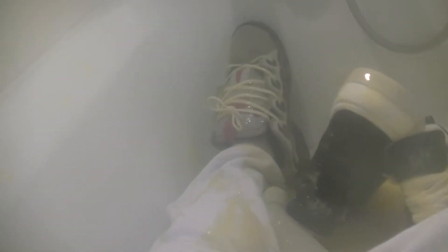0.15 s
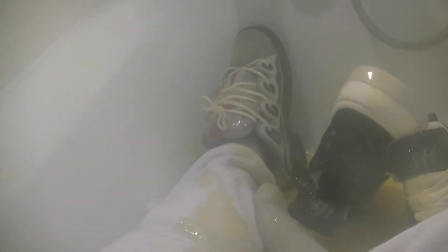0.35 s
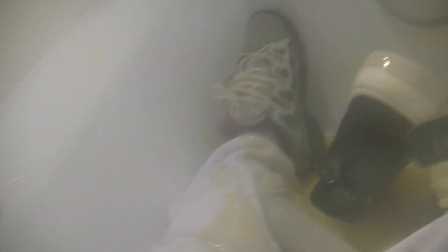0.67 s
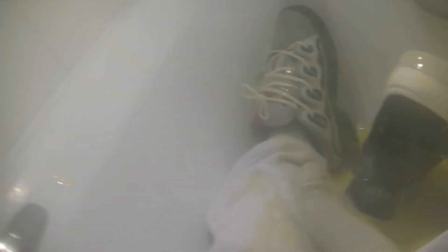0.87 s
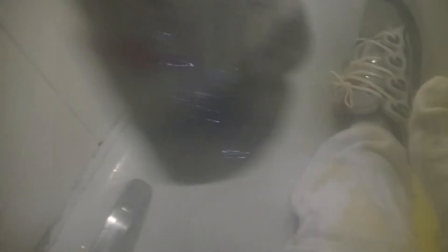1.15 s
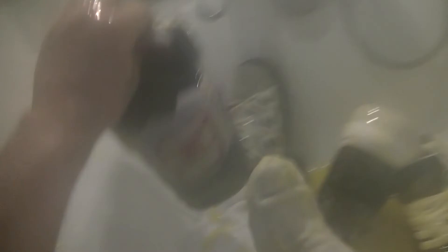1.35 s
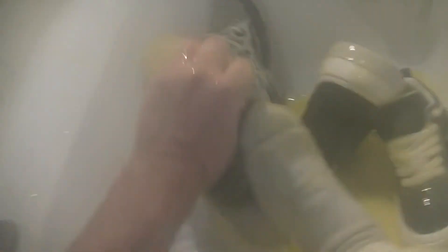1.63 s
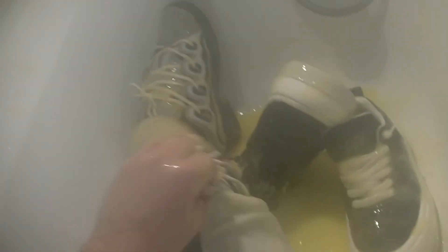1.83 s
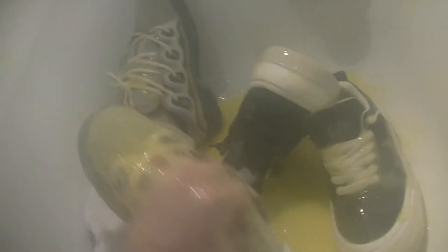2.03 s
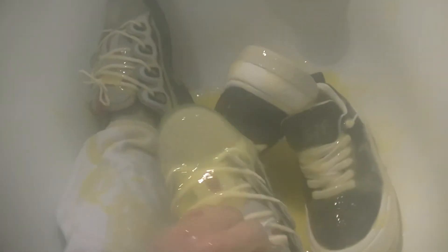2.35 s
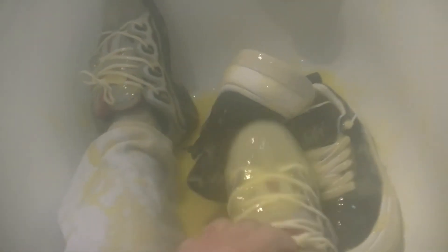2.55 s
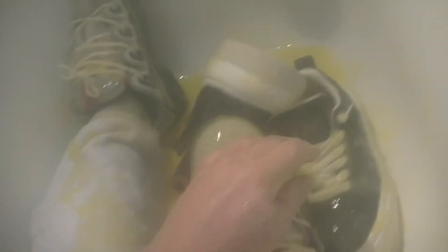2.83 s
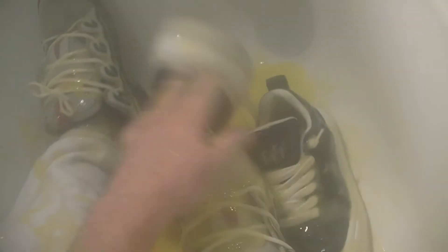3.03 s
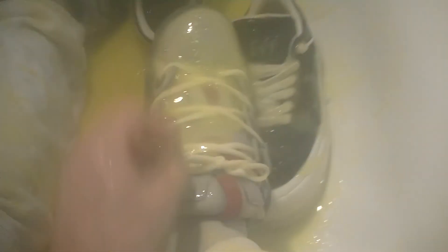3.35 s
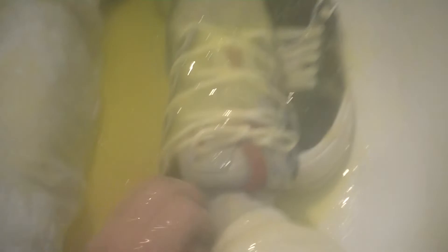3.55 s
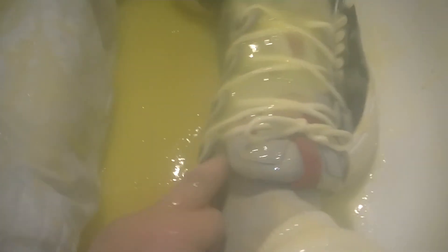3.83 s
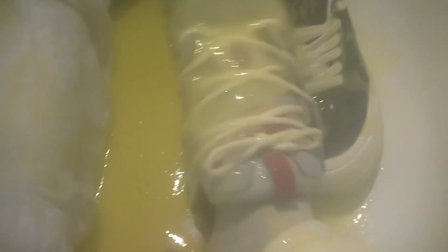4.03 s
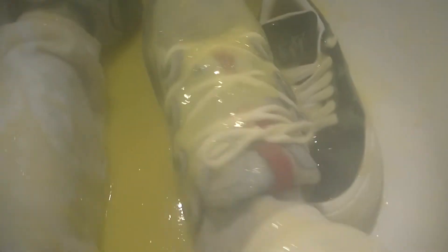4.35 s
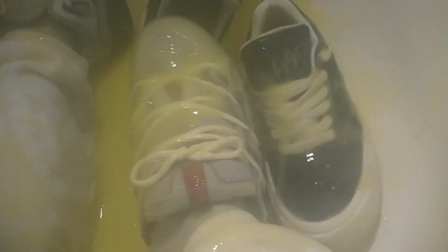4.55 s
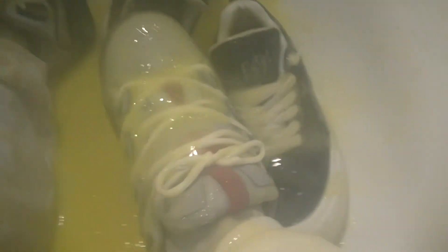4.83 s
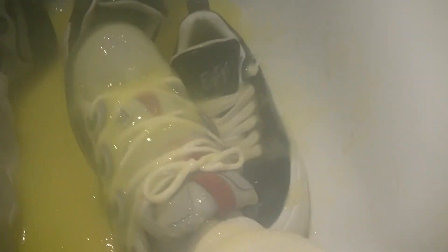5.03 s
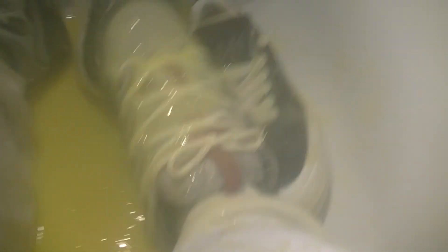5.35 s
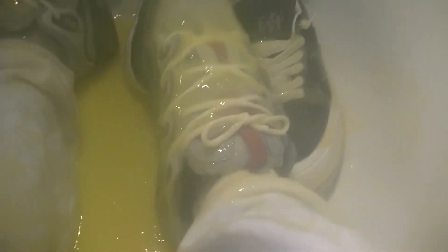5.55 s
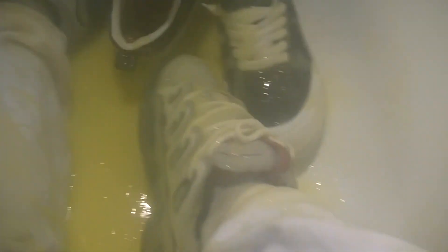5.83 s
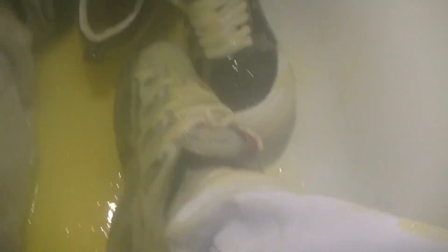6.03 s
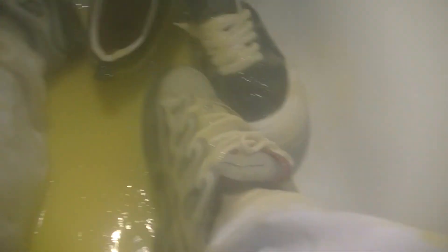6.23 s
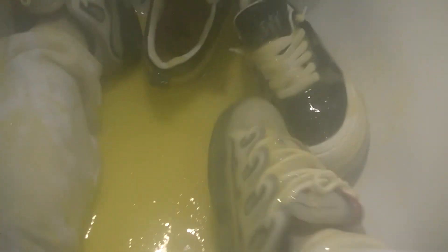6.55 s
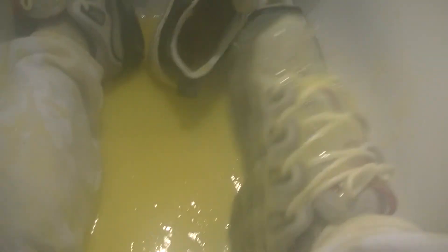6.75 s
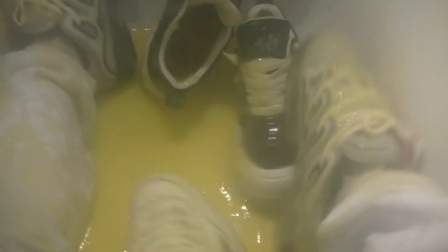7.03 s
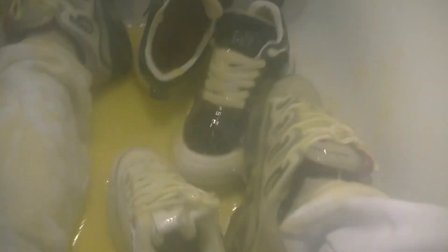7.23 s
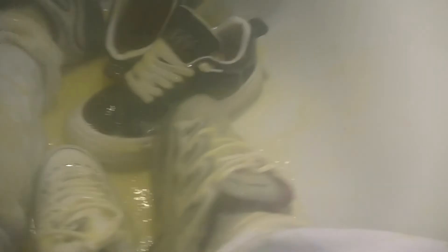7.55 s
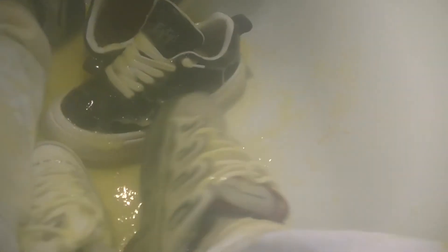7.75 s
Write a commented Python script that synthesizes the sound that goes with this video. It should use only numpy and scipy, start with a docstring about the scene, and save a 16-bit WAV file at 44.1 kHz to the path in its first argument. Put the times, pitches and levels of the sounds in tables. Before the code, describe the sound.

Frothy sliding cloth and wet shoes peel stickily in a tiled bathroom, amid hollow knocks, hard clicks and popping bubbles.

```python
"""A hushed tiled room comes first, then a faint wet smear and frothy squirts: sneakers pushed in a tub of slime.
Sliding cloth is dense crackle and foam; soles smack free as swelling pops that ring an air pocket.
Squirts are gliding tones or bands of noise, bubbles short rising rings, and shoe knocks ring the tub's modes.
A hand on a camera's case rubs, snaps, creaks and bumps close to the two microphone ports."""
import sys
import numpy as np
from scipy import signal
from scipy.io import wavfile
from scipy.ndimage import uniform_filter1d, minimum_filter1d

SR = 44100
rng = np.random.default_rng(int(sys.argv[2]) if len(sys.argv) > 2 else 0)


def unload_wav(signal):
    """Save mono or channel-first audio to the path in sys.argv[1] as 16-bit WAV at rate SR, clipped to [-1, 1]."""
    wavfile.write(
        sys.argv[1],
        SR,
        np.round(np.clip(np.atleast_2d(signal).T, -1, 1) * 32767).astype(np.int16),
    )


N = 347508
TIME = np.arange(N) / SR  # seconds

# All levels below are relative, ahead of each source's trims and the mix.
# suction lets go, in a snap or a slow peel: peak_s, level_db, pocket_hz, build_up_s, decay_s
SMACK_EVENTS = [(0.663, -39.5, 3420, 0.014, 0.0062), (0.728, -42, 5550, 0.0081, 0.13),
                (1.498, -34.5, 1480, 0.00098, 0.0022), (1.611, -34.5, 5600, 0.0013, 0.028),
                (2.101, -29.5, 5700, 0.0015, 0.0017), (2.223, -31.5, 5370, 0.0021, 0.012),
                (2.254, -33.5, 4930, 0.0048, 0.0087), (2.583, -34, 5360, 0.0073, 0.01),
                (2.943, -32.5, 5060, .001, 0.0049), (3.029, -39.5, 2000, 0.015, 0.028),
                (3.174, -29, 5100, 0.0019, 0.012), (3.194, -28, 4560, 0.0012, 0.0089),
                (3.214, -28, 1120, 0.0024, 0.012), (3.378, -34, 5100, 0.0051, 0.0066),
                (3.419, -31, 2886, 0.0095, 0.0036), (3.459, -33.5, 1980, 0.0098, 0.023),
                (3.855, -28.5, 4400, 0.039, 0.011), (3.887, -23.5, 5640, 0.015, 0.011),
                (4.149, -33, 2960, 0.032, 0.036), (4.446, -15.5, 5900, 0.0016, 0.003),
                (4.468, -19, 3660, 0.011, 0.004), (5.192, -32, 6170, 0.012, 0.033),
                (5.241, -22.5, 5300, 0.00074, 0.01), (5.271, -22, 3750, 0.0061, 0.013),
                (5.2911, -13, 3080, 0.005, 0.0017), (5.299, -16, 5500, 0.023, 0.0071),
                (5.665, -24, 2820, 0.0013, 0.0086), (5.684, -31, 5050, 0.022, .014),
                (6.604, -28, 3870, 0.021, 0.01), (6.748, -37.5, 10800, .004, 0.01),
                (6.928, -31.5, 5000, 0.0011, 0.008), (6.982, -35, 10800, 0.018, 0.01),
                (7.031, -27.5, 3970, 0.0052, 0.015), (7.074, -24, 6000, 0.0097, 0.0039),
                (7.097, -11.5, 3420, 0.0028, 0.0026), (7.1656, -4, 3700, 0.00043, 0.00048),
                (7.172, -7, 6050, 0.0007, 0.0054), (7.181, -21.5, 3700, 0.002, 0.024),
                (7.265, -13.5, 5700, 0.001, 0.0024), (7.2754, -11, 3580, 0.003, 0.0012),
                (7.484, -26.5, 5470, 0.00047, 0.016)]
# air squeezed through the slime: start_s, level_db, pitch_hz, length_s, glide (pitch factor), width_hz
SQUIRT_EVENTS = [(0.422, -36, 4900, 0.03, 0.89, 2000), (0.434, -37.5, 4940, 0.15, 1.02, 1820),
                 (0.435, -37.5, 3780, 0.25, 1.08, 450), (3.8375, -18, 2270, 0.0091, 0.85, 55.56),
                 (3.849, -33, 2120, 0.052, 1, 648.1), (4.441, -12.5, 3890, 0.012, 0.92, 150),
                 (4.444, -19, 1526, 0.01, 1.9, 100), (6.557, -41, 2160, 0.08, 1.24, 486),
                 (6.872, -30, 3890, 0.0092, 0.76, 216), (6.93, -24.5, 5060, 0.018, 1.22, 302.4),
                 (7.0215, -17, 3360, 0.029, 0.6, 70), (7.036, -34, 2174, 0.039, 1.4, 248)]
# air bubbles out of a shoe, one pop at a time: start_s, level_db, pitch_hz
BUBBLE_EVENTS = [(5.4584, -31.5, 3650), (5.4823, -29, 3860), (5.494, -28, 3650), (5.5019, -25.5, 3820),
                 (5.5321, -23, 3650), (5.5443, -24, 3900), (5.549, -21.5, 3250), (5.5542, -29, 3660),
                 (5.557, -19.5, 3750), (5.569, -40, 3620), (5.6594, -25, 3440), (5.682, -29, 3800),
                 (5.6938, -27, 3850), (7.169, -17, 3980), (7.27, -25, 3400), (7.2746, -15, 3580),
                 (7.846, -36, 3550)]
# wet cloth and soles sliding in the slime: time_s, level_db
SLIDING_LEVEL = [(0.0, -67.5), (0.46, -56.5), (0.61, -54.5), (0.94, -55.5), (1.25, -48), (1.38, -56.5),
                 (1.69, -58), (2.13, -47.5), (2.24, -52.5), (2.79, -55.5), (3.49, -53), (3.58, -47),
                 (4.19, -51), (4.34, -46.5), (4.54, -49), (4.67, -92), (4.91, -53.5), (5.22, -51.5),
                 (5.35, -42), (5.42, -53), (5.55, -47.5), (5.75, -53), (5.88, -49), (6.3, -57.5),
                 (6.98, -54), (7.11, -35), (7.18, -43), (7.31, -48), (7.55, -58), (7.88, -45.5)]
# where the work goes on: time_s, left_minus_right_db
WORK_PLACE = [(0.4, 1), (2.2, 1), (3.4, 5), (3.85, 3.5), (4.45, -7.5), (5.3, -2.5), (7.1, -2.5), (7.5, -1)]
# a shoe meets the tub: start_s, level_db, centre_hz, spread_octaves
THUD_EVENTS = [(0.58, -45, 199, 0.52), (0.627, -46.5, 242, 0.55), (0.791, -38.5, 88, 0.74),
               (1.213, -11.5, 68, 1.1), (1.227, -12.5, 100, 0.61), (1.234, -25.5, 256, 0.278),
               (1.283, -25, 133, 0.59), (2.174, -41.5, 322, 0.31), (2.247, -38, 350, 0.66),
               (2.944, -31.5, 339, 0.47), (3.2121, -14, 258, 0.56), (3.2463, -22.5, 225, 0.464),
               (3.3306, -24.5, 232, 0.51), (3.354, -39.5, 260, 0.68), (3.781, -40.5, 297, 0.36),
               (3.839, -40, 366, 0.81), (4.472, -24, 325, 0.45), (4.48, -30.5, 146, 0.2),
               (5.246, -37, 393, 1.2), (5.287, -32, 356, 0.54), (5.659, -41, 304, 0.75),
               (5.982, -43.5, 138, 1.16), (6.926, -36, 310, 0.67), (7.076, -40, 285, 0.26),
               (7.093, -32.5, 190, 0.6), (7.642, -43, 141, 0.68)]
# the tub's modes: mode_hz, level_db, t60_s
TUB_MODES = [(38.3, 5, 1.88), (45.2, 7, 0.76), (78.4, 1.5, 0.43), (112, 7.5, 0.5), (134.2, -15.5, 1),
             (168.5, 5.5, 0.18), (228, 1.5, 0.092), (260, -0.5, 0.24), (277, 2.5, 0.17), (310.4, -17, 0.49),
             (360, -8.5, 0.3), (400, -1, 0.18), (467.4, -8, 0.207), (551, -1.5, 0.12), (855, 13.5, 0.073),
             (940, 2, 0.43), (1151, 16.5, 0.095)]
# a sole drags on the tub's floor: start_s, level_db, length_s, centre_hz
DRAG_EVENTS = [(0.56, -55, 0.18, 190), (3.216, -53, 0.1, 930), (3.252, -48.5, 0.21, 377),
               (3.835, -60, 0.14, 470), (5.292, -53.5, 0.57, 300), (5.948, -50.5, 0.15, 75),
               (7.08, -37.5, 0.072, 137), (7.091, -51, 0.07, 315)]
# the hand shifts on the case: start_s, level_db, length_s, resonance_hz, width_hz
RUB_STROKES = [(1.21, -37.5, 0.076, 1390, 260), (1.215, -40.5, 0.13, 1950, 1300),
               (1.299, -38.5, 0.1, 2080, 1000), (1.932, -55, 0.12, 1300, 198), (2.151, -51, .16, 1930, 900),
               (2.387, -53.5, 0.069, 1280, 200), (4.331, -52.5, 0.14, 1310, 200),
               (5.28, -43.5, 0.14, 1730, 500), (5.386, -42, 0.072, 2100, 300),
               (5.441, -44, 0.094, 1320, 249), (5.972, -47, 0.11, 1280, 250),
               (6.063, -43.5, 0.11, 1900, 700), (6.126, -51.5, 0.13, 1380, 600),
               (7.637, -52.5, 0.095, 1330, 250), (7.761, -50.5, 0.086, 1340, 300),
               (7.804, -44, 0.092, 2030, 496)]
# the case snaps at the right port, at last in a creaking run: spike_s, level_db
SNAP_EVENTS = [(3.0078, -3.5), (3.2438, -7), (3.43, -4.5), (3.5653, -8.5), (3.626, -9), (3.6988, -10.5),
               (3.7183, -10.5), (3.8886, -8.5), (4.0106, -14), (4.2444, -3.5), (4.275, -13), (4.2885, 1.5),
               (4.297, -8), (4.336, -11), (4.492, -8), (4.5279, 1.5), (4.538, -8), (4.5639, 0),
               (4.573, -24), (4.5788, 2), (4.5794, -3.5), (4.5844, -14), (4.5863, -2), (4.6017, -16),
               (4.6077, -28), (4.6137, -3.5), (4.618, -2.5), (4.6228, -11), (4.6243, -4.5), (4.6273, -2),
               (4.6294, -16), (4.635, -6), (4.6422, -6), (4.6434, -8), (4.6492, -13), (4.6516, -4.5),
               (4.6532, -12), (4.6614, -2), (4.665, -14), (4.6688, -0.5), (4.6699, -5.5), (4.672, -8),
               (4.6817, -5.5)]
# the tighter the grip, the more low push a snap has: time_s, push_vs_spike_db
GRIP_PUSH = [(4.34, -18.5), (4.565, -14), (4.585, -9)]
# a finger rolls over both ports: centre_s, right_dent_db, left_swing_db, half_length_s
BUMP_EVENTS = [(3.911, -10.5, -8.5, 0.0025), (4.711, 7.5, -11, 0.0013), (4.7113, -2.5, -7, 0.0004)]
# colour of slime pops and foam: freq_hz, level_db (per Hz)
SLIME_COLOUR = [(40, -50), (150, -1), (400, -8.5), (900, -13.5), (1600, -3), (2500, -3), (3500, 3.5),
                (4500, -1), (5900, 3), (7200, -1.5), (8200, -17), (9700, -8), (12000, -18.5), (16000, -35)]
# colour of sliding wet cloth: freq_hz, level_db (per Hz)
SMEAR_COLOUR = [(200, -2), (400, -4.5), (850, -9.5), (1500, -15.5), (2300, -8.5), (3400, -1.5),
                (4500, -9.5), (5700, 3.5), (6700, -18.5), (8300, -11), (10000, -6), (13000, -9),
                (16000, -26)]
# the case's resonances: freq_hz, level_db (per Hz)
CASE_COLOUR = [(700, -15), (1100, -7), (1320, 5.5), (1600, -8), (1900, 4), (2200, 2), (2600, -19),
               (3200, -27), (5600, -11.5), (9000, -31)]
# colour of the grinding around a snap: freq_hz, level_db (per Hz)
GRIT_COLOUR = [(120, 7), (700, -8), (2200, -12.5), (5500, -22.5), (12000, -43)]
# colour of room quiet and hiss: freq_hz, level_db (per Hz)
HUSH_COLOUR = [(20, 2.5), (40, 6), (70, 6), (170, -5.5), (400, -10.5), (800, -26), (1200, -20), (2100, -19),
               (3400, -20.5), (5800, -20), (8300, -26), (11000, -27.5), (16000, -34.5)]
# how long the tiled room rings: freq_hz, t60_s
BATHROOM_DECAY = [(100, 0.063), (250, 0.85), (700, 0.94), (1800, 0.52), (4600, 0.41), (9000, 0.38),
                  (16000, 0.14)]

# small films let go at random while the shoes slide
FILMS_PER_S, FILM_ABOVE_SLIDING_DB, FILM_HZ, FILM_RISE_S, FILM_DECAY_S = 5.1, 4, 5300, 0.0025, .008
FOAM_PER_S, FOAM_LOW_HZ, FOAM_HIGH_HZ, FOAM_CYCLES, FOAM_SPREAD_DB = 990, 1900, 7020, 2.8, 2.5


def amp(db):
    """Decibels to gain."""
    return 10 ** (np.asarray(db) / 20)


def unit(x):
    """Scales to rms 1."""
    return x / np.sqrt(np.mean(x ** 2) + 1e-20)


def read(points, hz):
    """Joins (Hz, value) points on a log-frequency axis."""
    f, value = np.transpose(points)
    return np.interp(np.log(hz + 1), np.log(f + 1), value)


def sides(balance_db):
    """Left and right gains with mean 1."""
    gains = amp([[balance_db / 2], [-balance_db / 2]])
    return gains / gains.mean()


def place(s):
    """Left and right gains of the spot being worked at time s."""
    return sides(np.interp(s, *np.transpose(WORK_PLACE)))


def add(mix, s, sound):
    """Lays a stereo sound into the mix at time s."""
    part = mix[:, max(round(s * SR), 0):][:, :sound.shape[1]]
    part += sound[:, :part.shape[1]]


def colour(x, spectrum):
    """Causal minimum-phase filter with the given spectrum."""
    log_gain = np.log(amp(read(spectrum, abs(np.fft.fftfreq(2048, 1 / SR)))))
    taps = np.fft.ifft(np.exp(np.conj(signal.hilbert(log_gain)))).real[:1024]
    return signal.oaconvolve(x, taps[None], axes=1)[:, :x.shape[1]]


def resonate(x, hz, width_hz):
    """A resonance that follows the pitch hz: shift down, smooth, shift back up."""
    turn = np.exp(2j * np.pi * np.cumsum(hz * np.ones(x.shape[-1])) / SR)
    r = np.exp(-np.pi * width_hz / SR)
    return (turn * signal.lfilter([1 - r], [1, -r], x / turn)).real


def resonate_twice(x, hz, width_hz):
    """Two equal resonances in a row, for steeper skirts."""
    return resonate(resonate(x, hz, width_hz), hz, width_hz)


def crackle(size, per_s, spread_db):
    """Tiny bursts: sparse pops of random sign and very unequal strength."""
    chance, strength, sign = rng.random((3, size))
    pop_db = spread_db * np.minimum(-np.log(1 - strength), 4)
    return unit((chance < per_s / SR) * np.sign(sign - .5) * amp(pop_db))


def wobble(size, over_s):
    """Smooth chance of rms 1 that changes within over_s."""
    span = max(int(over_s * SR), 1)
    return unit(uniform_filter1d(uniform_filter1d(rng.standard_normal(size), span), span))


def stroke(length, attack_s=0.013, release_share=0.38):
    """A rub's envelope: quick attack, hold, slow release."""
    t = np.arange(int(length * SR)) / SR
    return np.minimum(t / attack_s, 1) * np.minimum((1 - t / length) / release_share, 1)


def smearing(froth, level_db=-2.0, per_s=3000, spread_db=3.0, fizz_db=-2, foam_db=-4,
             clump_db=2, clump_s=0.031, apart=1.0):
    """Soaked cloth slides: clumps of fine crackle and foam over a soft fizz."""
    shared = crackle(N, per_s, spread_db)
    pops = shared + apart * np.array([crackle(N, per_s, spread_db) for _ in range(2)])
    fizzing = unit(pops) + amp(fizz_db) * rng.standard_normal((2, N))
    sound = unit(colour(fizzing, SMEAR_COLOUR)) + amp(foam_db) * froth
    clumped = unit(sound * amp(clump_db * wobble(N, clump_s)))
    return clumped * amp(level_db + np.interp(TIME, *np.transpose(SLIDING_LEVEL)))


def foam(count=24):
    """A steady stream of tiny bubbles, each a short ring at one of a set of pitches."""
    t, out = np.arange(SR // 60) / SR, np.zeros(N)
    for hz in np.geomspace(FOAM_LOW_HZ, FOAM_HIGH_HZ, count):
        age = hz * t / FOAM_CYCLES
        ring = amp(read(SLIME_COLOUR, hz)) * age * np.exp(-age) * np.sin(2 * np.pi * hz * t) * np.sqrt(hz)
        out += signal.oaconvolve(crackle(N, FOAM_PER_S / count, FOAM_SPREAD_DB), ring)[:N]
    return unit(out)


def smacks(froth, foam_db=-3, per_s=5000, spread_db=3.5, pocket_db=-4, pocket_width_hz=1000, crest_db=9,
           spray_db=-5.0, spray_growth=0.43, spray_hz=10500, typical_db=-28):
    """A sole peels off: pops and bubbles crowd to a peak and ring the air pocket; hard ones spray more."""
    out, t = np.zeros((2, N)), np.arange(-SR // 10, SR // 8) / SR
    treble = signal.butter(2, spray_hz, "high", fs=SR)
    for s, db, hz, rise, decay in SMACK_EVENTS + films():
        swell = np.exp(np.minimum(t, 0) / rise - np.maximum(t, 0) / decay)
        bubbling = unit(froth.take(int(s * SR) + np.arange(len(t)), mode="wrap"))
        popping = unit(colour(crackle(len(t), per_s, spread_db)[None], SLIME_COLOUR))
        pops = swell * (popping + amp(foam_db) * bubbling)
        pocket = amp(pocket_db) * unit(resonate(pops, hz, pocket_width_hz))
        spray = amp(spray_db + spray_growth * (db - typical_db)) * unit(signal.lfilter(*treble, pops))
        burst = unit(unit(pops) + pocket + spray)
        add(out, s + t[0], amp(db - crest_db) * place(s) * burst * np.sqrt(np.mean(swell ** 2)))
    return out


def films():
    """Faint smacks at random moments, their level following the sliding that tears them."""
    when, pitch = rng.random((2, 100))
    times = (np.arange(len(when)) + when) / FILMS_PER_S
    events = []
    for s, p in zip(times, pitch):
        if s < TIME[-1]:
            db = np.interp(s, *np.transpose(SLIDING_LEVEL)) + FILM_ABOVE_SLIDING_DB
            events.append((s, db, FILM_HZ * 2 ** ((p - .5) / 2), FILM_RISE_S, FILM_DECAY_S))
    return events


def squirts(frothy_hz=400, overtone_db=-8, spit_db=-13, crest_db=6, waver=0.01, attack_s=0.0025,
            fade_power=1.95, settle_share=0.3):
    """Air forced through a wet gap whistles, clean if narrow, frothy if wide; the gap slides the pitch."""
    out = np.zeros((2, N))
    for s, db, hz, length, glide, width in SQUIRT_EVENTS:
        u = np.linspace(0, 1, int(length * SR))
        rough = np.clip(width / frothy_hz, 0, 1)
        air, flutter = rng.standard_normal((2, SR // 2))[:, :len(u)]
        pitch = hz * glide ** (1 - np.exp(-u / settle_share))
        wavering = pitch * (1 + waver * unit(uniform_filter1d(flutter, size=40)))
        phase = 2 * np.pi * np.cumsum(wavering) / SR
        overtones = sum(amp(overtone_db + read(SLIME_COLOUR, k * pitch)) * np.sin(k * phase)
                        for k in range(2, 5))
        clean = unit(np.sin(phase) + overtones)
        spit = amp(spit_db) * unit(colour(air[None], SLIME_COLOUR))
        froth = unit(resonate_twice(air, pitch, width)) + spit
        swell = np.minimum(u * length / attack_s, 1) * (1 - u) ** fade_power
        blend = np.sqrt(1 - rough) * clean + np.sqrt(rough) * froth
        add(out, s, amp(db - crest_db) * place(s) * swell * blend)
    return out


def bubbles(rise_s=0.00066, climb_per_s=12, spit_db=-10):
    """Each bubble rings for a few milliseconds, rising a little in pitch, and spits as it bursts."""
    out, t = np.zeros((2, N)), np.arange(SR // 50) / SR
    swell = t / rise_s * np.exp(1 - t / rise_s)
    for s, db, hz in BUBBLE_EVENTS:
        ring = np.sin(2 * np.pi * np.cumsum(hz * (1 + climb_per_s * (t - 2 * rise_s))) / SR)
        spit = unit(colour(rng.standard_normal((1, len(t))), SLIME_COLOUR))
        add(out, s, amp(db) * place(s) * swell * (ring + amp(spit_db) * spit))
    return out


def thuds(slap_db=-11, slap_s=0.016, contact_s=0.0019, skirt_db=-23):
    """Each blow rings the tub's modes near its centre, with a dull slap of displaced slime."""
    out, t = np.zeros((2, N)), np.arange(3 * SR // 2) / SR
    hz, mode_db, t60 = np.transpose(TUB_MODES)[:, :, None]
    modes = amp(mode_db - 60 * t / t60) * np.sin(2 * np.pi * hz * t)
    grid = np.geomspace(20, 16000, 40)
    for s, db, centre, spread in THUD_EVENTS:
        hump = np.exp(-.5 * (np.log2(grid / centre) / spread) ** 2)
        skirt = amp(skirt_db) * (grid > centre) / (1 + (grid / centre / 2) ** 2)
        force = hump + skirt
        ring = (-np.interp(hz, grid, force) * modes).sum(0)
        splash = rng.standard_normal((1, len(t))) * np.exp(-t / slap_s)
        slap = colour(splash, np.c_[grid, 20 * np.log10(force)])
        blow = ring / abs(ring).max() + amp(slap_db) * slap / abs(slap).max()
        blow = blow * (1 - np.exp(-t / contact_s))  # soft contact
        # keep out rumble far below each blow's centre
        blow = signal.lfilter(*signal.butter(2, centre / 4, "high", fs=SR), blow)
        add(out, s, amp(db) * place(s) * blow / abs(blow).max())
    return out


def dragging(per_s=300, spread_db=3, width_share=0.66):
    """Rubber sticks and slips on the tub's floor: a low, uneven mutter."""
    out = np.zeros((2, N))
    for s, db, length, hz in DRAG_EVENTS:
        mutter = resonate_twice(crackle(SR, per_s, spread_db), hz, width_share * hz)
        swell = stroke(length)
        add(out, s, amp(db) * place(s) * swell * unit(mutter[:len(swell)]))
    return out


def rubbing(balance_db=9, per_s=900, spread_db=3, apart=1.0, wander=0.029, wander_s=0.023,
            judder_db=3, judder_s=0.0015, sing_db=-5):
    """Skin slips in juddering jerks near the left port; each stroke's resonance wanders at random."""
    out = np.zeros((2, N))
    for s, db, length, hz, width in RUB_STROKES:
        jerks = crackle(SR // 2, per_s, spread_db) + apart * rng.standard_normal((2, SR // 2))
        slips = jerks * amp(judder_db * wobble(SR // 2, judder_s))
        pitch = hz * (1 + wander * wobble(SR // 2, wander_s))
        singing = unit(resonate_twice(slips, pitch, width))
        rasp = unit(colour(slips, CASE_COLOUR)) + amp(sing_db) * singing
        swell = stroke(length)
        add(out, s, amp(db) * sides(balance_db) * swell * unit(rasp[:, :len(swell)]))
    return out


def handling(spike_s=.000045, push_s=0.00043, push_scatter_db=2, leak=-0.28, rebound=0.72,
             rebound_s=0.000045, tip_db=-20, tip_growth=0.24, grit_db=-11, grit_s=0.0033):
    """Case snaps: a spike, sharper when hard, a damped low push and grit; weak and inverted at the left."""
    out, t = np.zeros((2, N)), np.arange(-SR // 50, SR // 50) / SR
    after = np.maximum(t, 0)
    push = -np.gradient(after ** 4 * np.exp(-after / push_s))
    spike = np.exp(-.5 * (t / spike_s) ** 2) - rebound * np.exp(-.5 * (t / rebound_s - 1) ** 2)
    for (s, db), chance in zip(SNAP_EVENTS, rng.uniform(-1, 1, 100)):
        push_db = np.interp(s, *np.transpose(GRIP_PUSH)) + push_scatter_db * chance
        tip = amp(tip_db + tip_growth * db) * (t == 0)  # a single sample
        snap = spike + tip + amp(push_db) * push / abs(push).max()
        grinding = unit(colour(rng.standard_normal((1, len(t))), GRIT_COLOUR))
        grit = amp(push_db + grit_db) * np.exp(-abs(t) / grit_s) * grinding
        add(out, s + t[0], amp(db) * np.array([[leak], [1]]) * (snap + grit))
    return out


def bumps(low_cut_hz=45):
    """A finger seals the right port, a sharp pressure dent, and swings the air at the left; slow parts leak."""
    out, t = np.zeros((2, N)), np.arange(-SR // 25, SR // 25) / SR
    for s, dent_db, swing_db, half in BUMP_EVENTS:
        u = t / half
        swing = u * np.exp(.5 - .5 * u ** 2)
        dent = np.exp(-abs(u) / 2) - 2 * np.exp(-abs(u))
        add(out, s + t[0], np.array([amp(swing_db) * swing, amp(dent_db) * dent]))
    return signal.lfilter(*signal.butter(1, low_cut_hz, "high", fs=SR), out)


def reflect(x, t60, delay_s, length_s):
    """Dense echoes of energy 1, different at each port, every band dying at its own speed."""
    taps = rng.standard_normal((2, SR)) * (np.arange(SR) > delay_s * SR)
    hz, t, z = signal.stft(taps, SR, nperseg=128)
    fading = z * amp(-60 * t / read(t60, hz)[:, None])
    tail = signal.istft(fading, SR, nperseg=128)[1][:, :int(length_s * SR)]
    return signal.oaconvolve(x, tail / np.linalg.norm(tail, axis=1, keepdims=True), axes=1)[:, :N]


def hush(level_db=-54, apart=4.1, mono_hz=300):
    """The quiet room and the microphones' hiss; the deep bass is nearly the same at both ports."""
    own = signal.lfilter(*signal.butter(1, mono_hz, "high", fs=SR), rng.standard_normal((2, N)))
    return amp(level_db) * unit(colour(rng.standard_normal(N) + apart * own, HUSH_COLOUR))


def scene(direct_db=-2, walls_db=-4, room_db=-7, knock_room_db=-14):
    """The tub's walls echo at once; the tiled room rings on behind them."""
    froth = foam()
    wet = smacks(froth) + squirts() + bubbles()
    knocks = thuds() + dragging()
    wall_decay = [(100, 0.028), (16000, 0.013)]  # freq_hz, t60_s
    near = amp(direct_db) * wet + amp(walls_db) * reflect(wet, wall_decay, 0.0011, .1)
    room = reflect(amp(room_db) * wet + amp(knock_room_db) * knocks, BATHROOM_DECAY, 0.0085, 0.98)
    return near + knocks + room + smearing(froth) + rubbing() + handling() + bumps() + hush()


def record(dry, limit_db=-2.5, overshoot=1.4, hold_s=0.046, settle_s=.003, recover_db_per_s=550, edge_hz=16400):
    """A limiter ducks too far, holds and lets go; the tallest spikes clip; then the band limit."""
    loudness_db = 20 * np.log10(uniform_filter1d(abs(dry).max(0), size=24) + 1e-6)
    over_db = np.maximum(loudness_db - limit_db, 0)
    half = int(hold_s * SR / 2)
    held_db = -minimum_filter1d(-over_db, 2 * half + 1, origin=half)
    fall = TIME * recover_db_per_s
    recovering_db = np.maximum.accumulate(overshoot * held_db + fall) - fall
    lag = np.exp(-1 / (settle_s * SR))
    slow_db = signal.lfilter([1 - lag], [1, -lag], recovering_db)
    clipped = np.clip(dry / amp(np.maximum(held_db, slow_db)), -.9, .9)
    band_limit = signal.firwin(511, edge_hz, window=("kaiser", 9), fs=SR)
    return signal.oaconvolve(clipped, band_limit[None], "same")


dry = scene()
out = record(dry)
unload_wav(out)
```